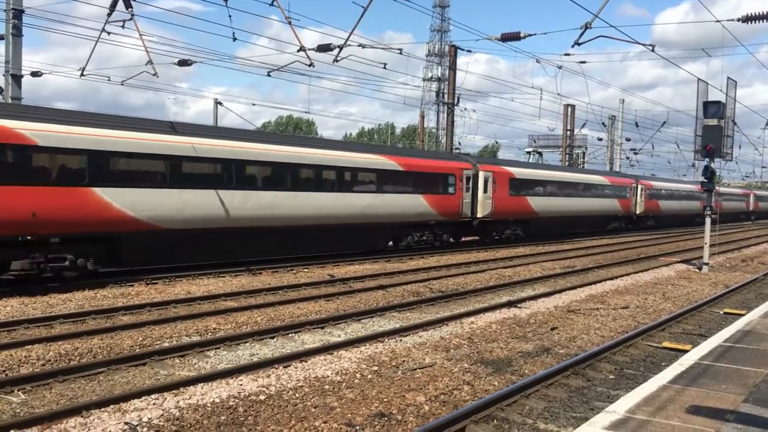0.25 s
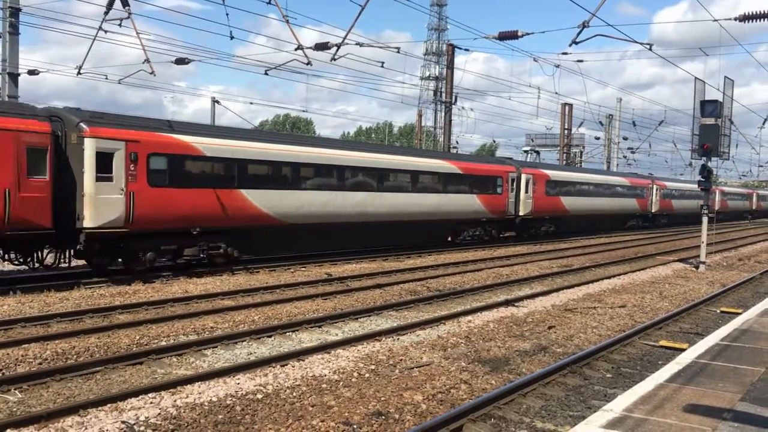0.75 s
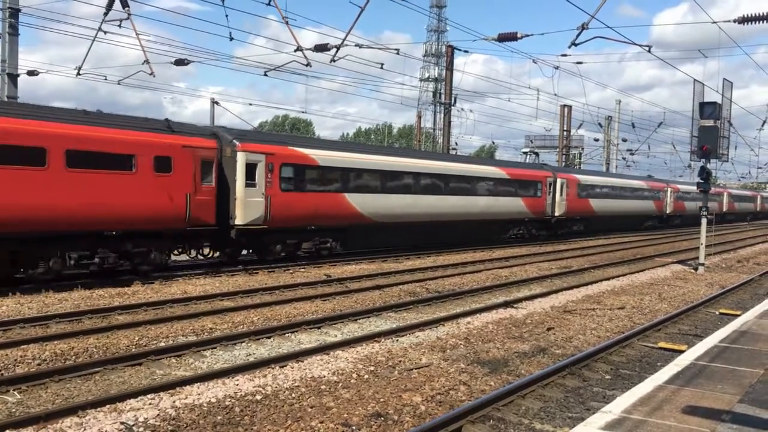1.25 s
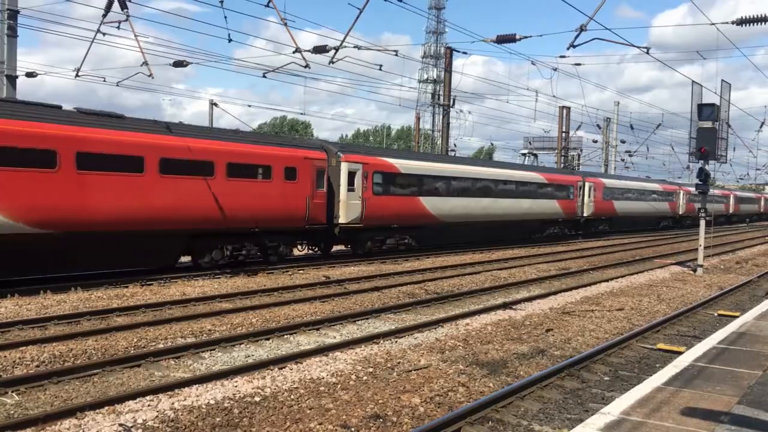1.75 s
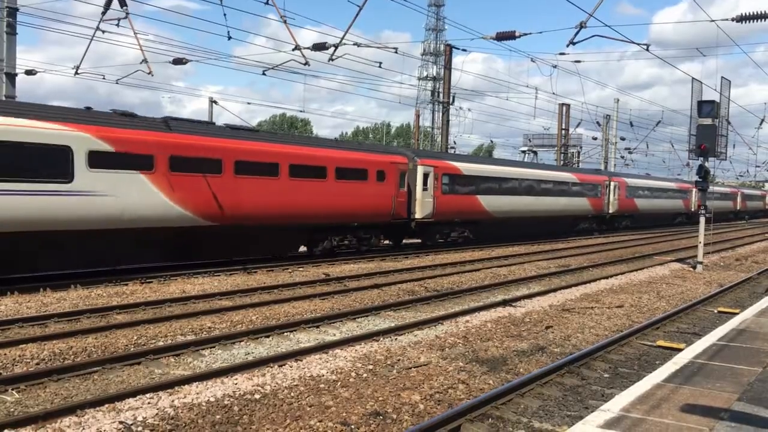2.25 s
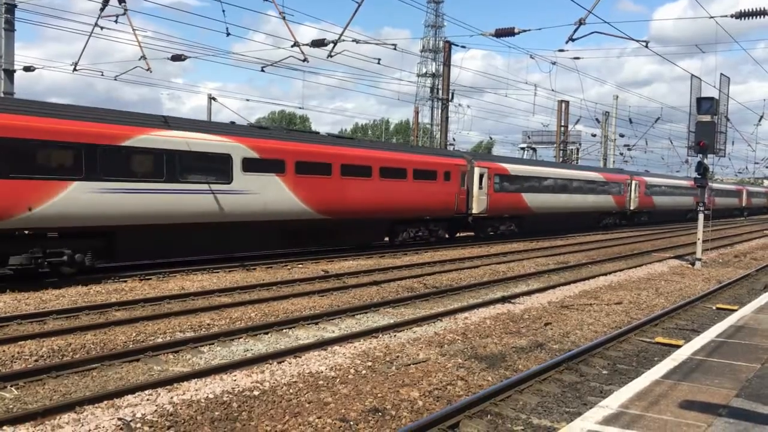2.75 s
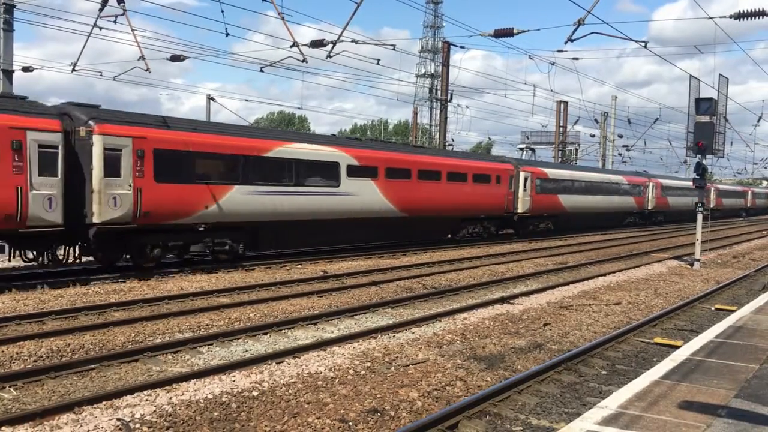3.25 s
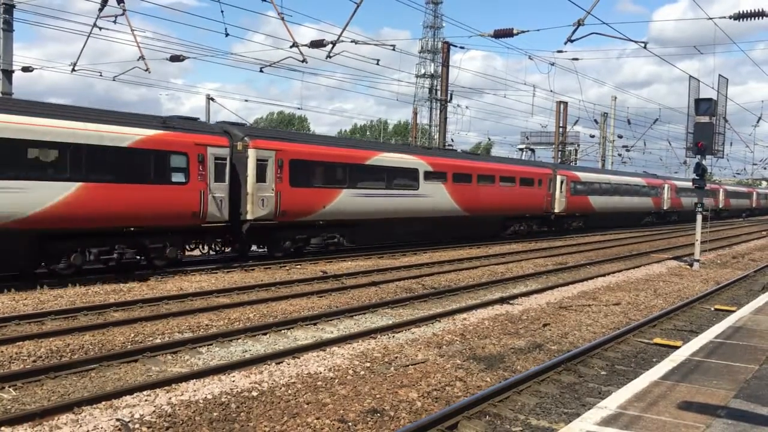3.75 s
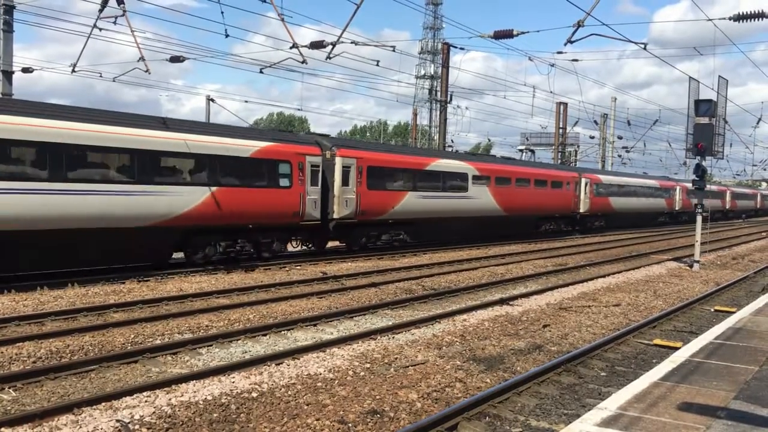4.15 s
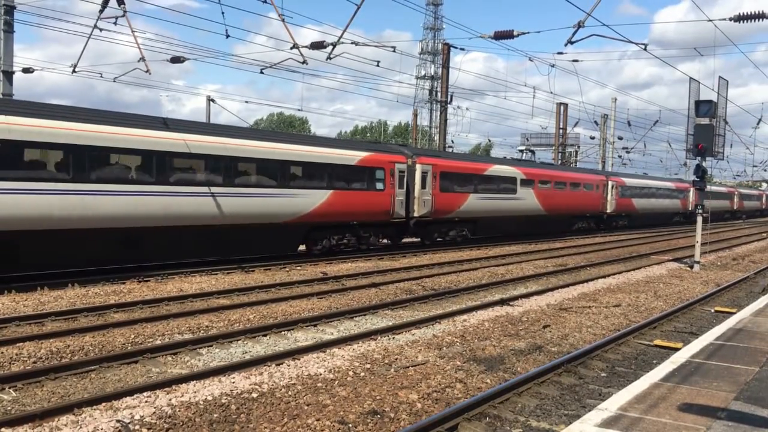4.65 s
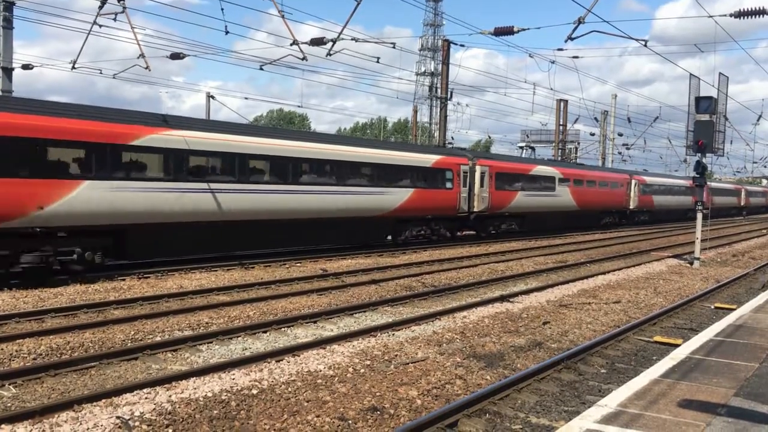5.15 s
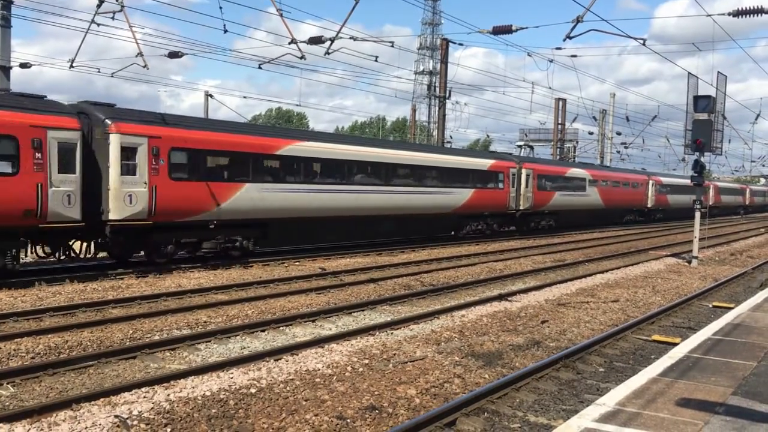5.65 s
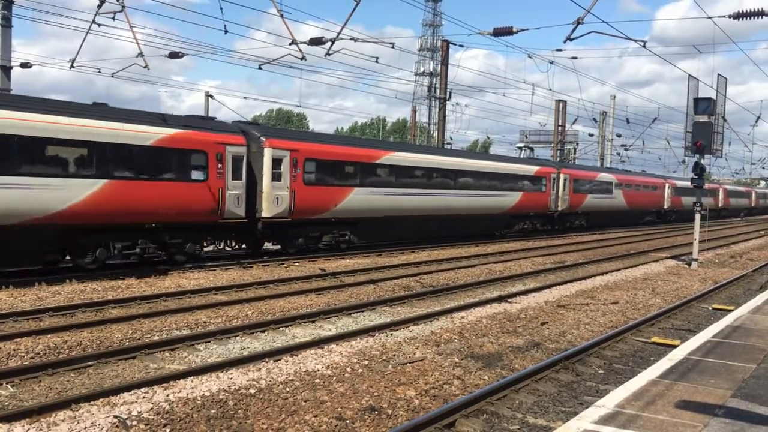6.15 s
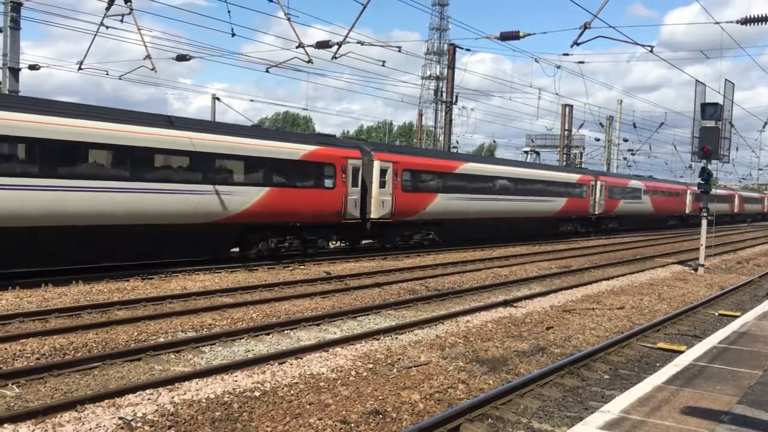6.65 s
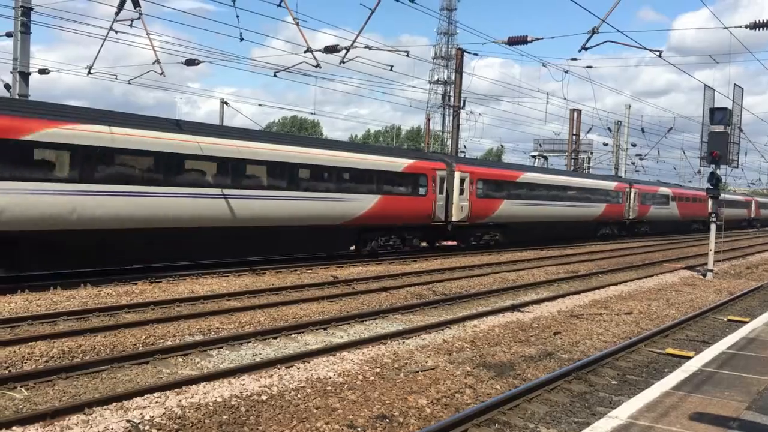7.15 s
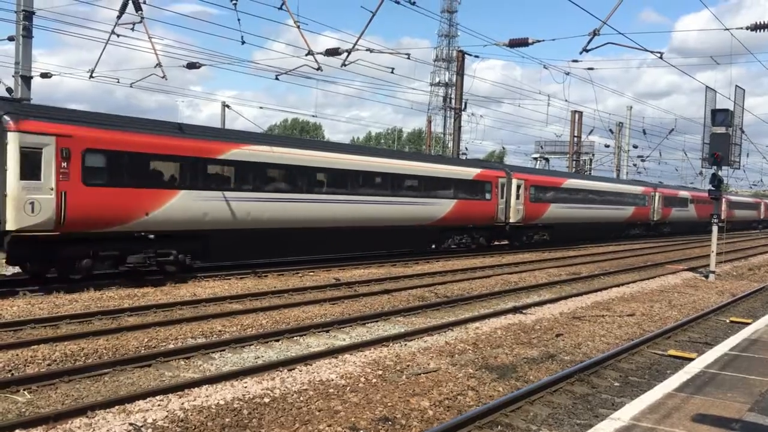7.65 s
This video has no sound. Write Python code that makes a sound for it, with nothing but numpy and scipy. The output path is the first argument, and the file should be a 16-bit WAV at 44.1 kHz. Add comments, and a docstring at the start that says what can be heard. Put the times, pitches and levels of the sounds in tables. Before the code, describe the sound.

Wind thumps and pops on the microphone as a passing train rumbles softly, its wheels clacking in pairs with a faint steel ring.

```python
"""From the start a breeze buffets the microphone in low lumps, over the hiss of its electronics,
while coaches roll slowly past a platform, wheels and rails rumbling and ringing faintly.
Soon the wind pops, and a faint hiss swells from the wheels, once a coach.
From 1.4 s the axles clack over one rail joint in groups of four: rail and wheel ring, the sleeper thuds.
Towards the end the rolling grows louder and the buffets crowd together."""
import sys
import numpy as np
from scipy import signal
from scipy.fft import rfft, irfft, next_fast_len
from scipy.io import wavfile
from scipy.ndimage import uniform_filter1d

SR = 44100
rng = np.random.default_rng(int(sys.argv[2]) if len(sys.argv) > 2 else 0)


def digitize_waveform(pressure):
    """Quantize a signal to 16-bit integers and store it at the path in sys.argv[1].

    Rows of a 2-D input are taken as channels; values are limited to [-1, 1].
    """
    field = np.atleast_2d(pressure).T
    bounded = np.clip(field, -1, 1)
    quanta = np.round(bounded * 32767).astype(np.int16)
    wavfile.write(sys.argv[1], SR, quanta)


N = 348779

# The wind's three colours: slow pressure swings, small eddies and the rush of the finest eddies.
# Each row: frequency in Hz, relative level in dB.
SWING_SPECTRUM = [(12, -44), (20, -4), (38, -1.5), (59, 5), (109, -6), (134, -22), (159, -17.5), (260, -30),
                  (340, -62), (570, -120)]
EDDY_SPECTRUM = [(80, -12), (130, 6), (200, -3.5), (320, -14.5), (500, -35.5), (900, -54.5), (1500, -58)]
RUSH_SPECTRUM = [(120, -24), (180, -2.5), (250, 3), (400, -7.5), (700, -22), (1200, -35), (2000, -52)]
# The breeze between buffets. Each row: time in seconds, then swing, eddy and rush levels in dB.
BREEZE_LEVELS = [(0.0, -37, -51.5, -76), (0.24, -40.5, -49.5, -67), (0.75, -40, -49.5, -67.5),
                 (1.17, -43.5, -52.5, -68), (1.58, -36, -50, -57), (1.96, -42, -50, -65.5),
                 (3.35, -37.5, -49, -60.5), (3.85, -39.5, -50.5, -62), (4.23, -41, -52, -65),
                 (4.67, -40.5, -48, -57.5), (5.15, -39, -45, -58), (5.93, -34, -49.5, -54.5),
                 (6.3, -39.5, -47.5, -57), (6.98, -35, -47, -51.5), (7.14, -39, -39.5, -52),
                 (7.42, -37, -45, -58.5), (7.73, -39.5, -43.5, -45), (7.91, -37, -34, -59)]
# Buffets on the microphone. Each row: peak time in seconds, swing, eddy and rush levels in dB,
# nominal length in seconds.
WIND_BUFFETS = [(0.082, -28.5, -44.5, -49, 0.016), (0.206, -30, -38, -57, 0.032),
                (0.444, -27, -46, -50.5, 0.055), (0.614, -30.5, -43.5, -55.5, 0.12),
                (0.809, -30, -31, -38, 0.012), (0.844, -33, -43, -64, 0.034), (0.886, -39, -36, -64, 0.026),
                (0.966, -31, -48, -58, 0.029), (1.037, -28, -42, -48, 0.019), (1.47, -33.5, -53, -66, 0.12),
                (1.626, -40, -46, -59, 0.2), (1.837, -30.5, -62, -64, 0.024),
                (2.073, -34.5, -52, -68, 0.042), (2.349, -26, -35, -56, 0.046),
                (2.569, -33, -60, -70, 0.11), (3.029, -26.5, -46, -59, 0.025),
                (3.175, -39, -38, -60, 0.034), (3.604, -39, -43, -70, 0.015), (3.827, -31, -51, -60, 0.13),
                (4.866, -31, -45, -58, .045), (4.979, -30.5, -48, -57, 0.037),
                (5.017, -20.5, -36, -51, 0.023), (5.101, -24.5, -33, -48.5, 0.07),
                (5.327, -22.5, -45, -56, 0.045), (5.454, -35, -42, -66, 0.069),
                (5.532, -31.5, -43, -49, 0.081), (5.708, -37, -43, -49, 0.032),
                (5.814, -34.5, -44, -59, 0.13), (5.946, -31, -42.5, -57, .06),
                (6.068, -31, -53, -62.5, 0.096), (6.342, -35, -44, -62, 0.046),
                (6.502, -34.5, -40, -59, 0.11), (6.603, -30.5, -47, -56, 0.063), (6.78, -33, -49, -70, .05),
                (6.925, -25.5, -34, -49, 0.019), (6.962, -28.5, -33, -43, 0.043),
                (7.055, -38, -33, -33, 0.13), (7.151, -31, -37, -44, 0.074), (7.378, -24, -31, -43.5, 0.05),
                (7.462, -27, -41, -50.5, 0.044), (7.519, -25, -34.5, -52.5, 0.062),
                (7.617, -38, -36, -33, 0.037), (7.702, -36.5, -38, -36, 0.21),
                (7.78, -29.5, -32, -53.5, 0.034), (7.878, -37.5, -30.5, -37, 0.075)]
# The train's swell. Each row: time in seconds, rumble level in dB, wheel ring level in dB.
ROLLING_LEVELS = [(0, -60.5, -91), (1.2, -59.5, -90.5), (2.3, -58.5, -85.5), (3.0, -59.5, -89),
                  (4.2, -57.5, -87.5), (5.4, -57.5, -86.5), (6.1, -55, -84.5), (7.0, -52, -89),
                  (7.5, -53.5, -81), (7.91, -55, -75)]
# The colour of steel rolling on steel. Each row: frequency in Hz, relative level in dB.
ROLLING_SPECTRUM = [(150, -23), (250, -2.5), (335, -4.5), (499, -14), (617, -11), (827, -19), (933, -18.5),
                    (1050, -21), (1550, -26.5), (1770, -29), (3720, -42.5), (4850, -53.5), (6000, -52.5),
                    (7800, -68.5), (13200, -120)]
# The colour of the electronics' hiss. Each row: frequency in Hz, relative level in dB.
HISS_SPECTRUM = [(1760, -18), (3000, -3.5), (4850, -9), (5380, -8), (7690, -11), (8940, -9.5), (10500, -14),
                 (12000, -12), (15500, -16.5)]
# Sudden pops of wind. Each row: peak time in seconds, peak level in dB, width in milliseconds.
WIND_POPS = [(0.442, -36, 0.76), (0.602, -35, 1.0), (0.805, -32, 0.93), (1.039, -37, 0.89), (3.176, -36, 1),
             (5.078, -18.5, 0.78), (5.093, -23.5, 1.0), (5.121, -32, 0.49), (5.698, -29, 0.94),
             (6.704, -25.5, 1), (6.919, -31, 0.84), (6.96, -14, 0.78), (7.005, -29.5, 0.97),
             (7.128, -37.5, .8), (7.368, -24, 0.92), (7.605, -27, 0.56), (7.714, -28, 0.98)]
# The wheel hiss, lower band then upper. Each row: centre in Hz, width in Hz.
WHEEL_BANDS = [(3100, 780), (6300, 1500)]
# One swell of wheel hiss a coach. Each row: start in seconds, lower and upper band levels in dB.
WHEEL_SWELLS = [(.57, -82.5, -92.5), (3.15, -87, -92.5), (5.45, -94, -94)]
# Axles over the joint, and one fainter knock between groups. Each row: start in seconds, rail, thud and
# edge levels in dB, contact time and thud delay in milliseconds, wheel ring level in dB.
AXLE_HITS = [(1.383, -50, -45.5, -64, 6.9, 17, -63), (1.664, -54, -43.5, -66.5, 18, 5, -66),
             (2.139, -54.5, -47.5, -69.5, 23, 5.5, -65), (2.417, -55.5, -46, -63, 15, 8.3, -68),
             (2.8, -63.5, -52, -83, 12, 6.1, -78), (3.823, -51, -38.5, -61.5, 7.8, 14, -67),
             (4.093, -55.5, -42, -67.5, 46, 11.4, -72), (4.547, -54.5, -43.5, -62.5, 15, 4, -63),
             (4.81, -53.5, -44.5, -62.5, 8.2, 7.17, -64), (6.163, -49.5, -42, -62, 19, 13.5, -67),
             (6.42, -52, -45, -65, 28, 8.4, -66), (6.88, -49, -47.5, -61.5, 14, 7, -65),
             (7.13, -50.5, -49, -71, 35, 3.7, -72), (7.891, -49.5, -50, -65.5, 14, 2.4, -68)]
# What a clack sets ringing: the bright rail edge, the rail, the dull sleeper and the wheel.
# Each row: frequency in Hz, width in Hz, relative level in dB.
EDGE_MODES = [(2480, 350, 0.5), (2900, 470, 4), (3470, 480, 2), (3930, 450, -2.5), (4480, 590, -11),
              (5500, 600, -13), (6770, 730, -16), (8200, 920, -26.5)]
RAIL_MODES = [(770, 160, -0.5), (960, 139, 4.5), (1150, 210, -0.5), (1334, 225, -4.5), (1460, 170, -5),
              (1656, 110, -7.5), (1740, 110, -12), (2125, 290, -10)]
SLEEPER_MODES = [(323, 34.6, -3.5), (570, 380, -17), (609, 60, -14)]
WHEEL_MODES = [(1052, 40, 3), (1600, 23, -5.5), (2160, 30, -2), (3020, 45, -7.5), (3440, 45, -11),
               (3690, 40, -10), (4500, 50, -14)]

LUMP_DB, LUMP_RATE_HZ = 2.5, 10.7   # unevenness of the breeze
SWING_SHARE, EDDY_SHARE = 0.73, 0.54   # half-power width of a buffet, as a share of its nominal length
DULL_FROM_DB, DULLING = -61.5, 1.1   # above this rolling level the treble lags: dB lost per dB gained
HISS_RISE_S, HISS_HOLD_S, HISS_FALL_S = 0.13, 0.37, 0.12   # shape of a wheel hiss swell
STEEL_DELAY_S = 0.0015   # from a clack's start to the sound of the steel
WHEEL_SPREAD_DB = 5   # each wheel rings its modes with strengths of its own
HISS_DB, LOW_CUT_HZ, HIGH_CUT_HZ, END_FADE_S = -81.5, 30.0, 15640, 0.003


def from_db(db):
    """Decibels to gain."""
    return 10 ** (np.asarray(db) / 20)


def rms_one(x):
    """Scale to rms 1."""
    return x / np.sqrt(np.mean(x ** 2) + 1e-20)


def fader_curves(rows):
    """Each level column of a timed table, drawn out to every sample."""
    times, *columns = np.transpose(rows)
    return [np.interp(np.arange(N) / SR, times, column) for column in columns]


def drift(rate_hz):
    """A slow random wobble: noise through a double one-pole low-pass, spread 1."""
    hop, settle = 40, 2000
    pole = np.exp(-2 * np.pi * rate_hz * hop / SR)
    noise = rng.standard_normal(N // hop + settle + 2)
    slow = signal.lfilter([1], [1, -2 * pole, pole * pole], noise)[settle:]
    return np.interp(np.arange(N) / hop, np.arange(len(slow)), rms_one(slow))


def coloured(spectrum):
    """Noise with the given spectrum, at rms 1."""
    size = next_fast_len(N)
    hz = np.fft.rfftfreq(size, 1 / SR)
    points_hz, db = np.transpose(spectrum)
    gain = from_db(np.interp(np.log(hz + 1), np.log(points_hz), db, left=-90, right=-90))
    return rms_one(irfft(gain * rfft(rng.standard_normal(size)), size)[:N])


def resonate(x, hz, width_hz):
    """One resonance, gain 1 at its peak."""
    r = np.exp(-np.pi * width_hz / SR)
    feedback = [1, -2 * r * np.cos(2 * np.pi * hz / SR), r * r]
    return signal.lfilter(np.array([1, 0, -1]) * (1 - r * r) / 2, feedback, x)


def evened(x, span_s):
    """Gentle compression that partly levels the chance swells of a noise."""
    power = uniform_filter1d(x ** 2, size=round(span_s * SR))
    return rms_one(x / (power + 0.11) ** 0.2)


def buffeted(breeze_db, column, share):
    """The wind's level in dB: each buffet adds a bell-shaped swell of power to the breeze."""
    power, t = from_db(2 * breeze_db), np.arange(N) / SR
    for row in WIND_BUFFETS:
        peak_s, width_s = row[0], share * row[4]
        near = slice(max(int((peak_s - 0.4) * SR), 0), int((peak_s + 0.4) * SR))
        bell = np.exp(-4 * np.log(2) * ((t[near] - peak_s) / width_s) ** 2)
        power[near] += from_db(2 * row[column]) * bell
    return 10 * np.log10(power)


def wind():
    """Turbulence comes in lumps: pressure swings, small eddies flutter, hard gusts add a finer rush."""
    swing_db, eddy_db, rush_db = fader_curves(BREEZE_LEVELS)
    lumps = drift(LUMP_RATE_HZ)
    eddy_lumps_db = LUMP_DB * (0.32 * lumps + 0.57 * drift(LUMP_RATE_HZ))
    swing_db = buffeted(swing_db + LUMP_DB * lumps, column=1, share=SWING_SHARE)
    eddy_db = buffeted(eddy_db + eddy_lumps_db, column=2, share=EDDY_SHARE)
    rush_db = buffeted(rush_db + eddy_lumps_db, column=3, share=EDDY_SHARE)
    flutter_db = 3.0 * drift(rate_hz=30)
    swings = evened(coloured(SWING_SPECTRUM), span_s=0.035) * from_db(swing_db + 2.9 * drift(rate_hz=21))
    eddies = evened(coloured(EDDY_SPECTRUM), span_s=0.029) * from_db(eddy_db + flutter_db)
    rush = evened(coloured(RUSH_SPECTRUM), span_s=0.014) * from_db(rush_db + 0.68 * flutter_db)
    return swings + eddies + rush


def rolling():
    """Rough steel on steel: the rumble outgrows the treble as it swells, and one wheel mode sings."""
    level_db, ring_db = fader_curves(ROLLING_LEVELS)
    treble_db = -DULLING * np.maximum(level_db - DULL_FROM_DB, 0)
    rumble = coloured(ROLLING_SPECTRUM)
    treble = signal.sosfilt(signal.butter(2, 2000, "high", fs=SR, output="sos"), rumble)
    rumble = rumble + (from_db(treble_db) - 1) * treble
    ring = rms_one(resonate(rng.standard_normal(N), hz=2154, width_hz=110))
    return from_db(level_db + 0.93 * drift(rate_hz=22)) * rumble + from_db(ring_db) * ring


def wind_pops():
    """Each pop is a lone smooth pressure bump; the narrower, the brighter."""
    out, offsets = np.zeros(N), np.arange(-300, 300)
    for peak_s, db, width_ms in WIND_POPS:
        squared = (offsets / SR / (width_ms / 1000)) ** 2
        bump = (1 - 0.16 * squared / (1 + squared)) / (1 + squared) ** 0.95
        out[round(peak_s * SR) + offsets] += from_db(db) * bump * np.hanning(len(offsets))
    return out


def wheel_hiss():
    """The wheels hiss in two broad bands of noise that rise, hold and fall once a coach."""
    out, t = np.zeros(N), np.arange(N) / SR
    for band, (hz, width_hz) in enumerate(WHEEL_BANDS):
        swell = np.zeros(N)
        for start_s, *band_db in WHEEL_SWELLS:
            corners_s = np.cumsum([start_s, HISS_RISE_S, HISS_HOLD_S, HISS_FALL_S])
            swell += from_db(band_db[band]) * np.interp(t, corners_s, [0, 1, 1, 0])
        out += swell * rms_one(resonate(rng.standard_normal(N), hz, width_hz))
    return out


def body(force, modes):
    """A force rings parallel modes of alternating polarity; white noise keeps about its level."""
    power = sum(from_db(2 * db) * np.pi * width_hz / SR for _, width_hz, db in modes)
    ringing = sum((-1) ** k * from_db(db) * resonate(force, hz, width_hz)
                  for k, (hz, width_hz, db) in enumerate(modes))
    return ringing / np.sqrt(power)


def struck(modes, column, delays_s, knock, grind_fall_s, rattle_db, rattle_t60_s):
    """Each axle knocks once, grinds across the gap for the contact time, and leaves a weaker rattle."""
    force, t = np.full(N + SR, 1e-18), np.arange(SR // 2) / SR
    roughness = rng.standard_normal(N + SR)
    for row, delay_s in zip(AXLE_HITS, delays_s):
        start, gain, contact_s = round((row[0] + delay_s) * SR), from_db(row[column]), row[4] / 1000
        released_s = np.maximum(t - contact_s, 0)
        grind = from_db(-400 * t - 60 * released_s / grind_fall_s)   # dies faster once contact ends
        rattle = from_db(rattle_db - 60 * released_s / rattle_t60_s)
        span = slice(start, start + len(t))
        force[span] += gain * (grind + rattle) * roughness[span]
        force[start] += gain * knock
    return body(force[:N], modes)


def clacks():
    """An axle hits the joint: edge and rail speak first, then the thud of the sleeper."""
    steel_delays_s = np.full(len(AXLE_HITS), STEEL_DELAY_S)
    thud_delays_s = np.array(AXLE_HITS)[:, 5] / 1000
    edge = struck(EDGE_MODES, column=3, delays_s=steel_delays_s, knock=10.0,
                  grind_fall_s=0.15, rattle_db=-15, rattle_t60_s=0.58)
    rail = struck(RAIL_MODES, column=1, delays_s=steel_delays_s, knock=15.5,
                  grind_fall_s=0.32, rattle_db=-8.0, rattle_t60_s=0.44)
    thud = struck(SLEEPER_MODES, column=2, delays_s=thud_delays_s, knock=19.4,
                  grind_fall_s=0.65, rattle_db=-10.5, rattle_t60_s=0.13)
    soften = signal.butter(2, 1100.0, fs=SR, output="sos")   # timber and ballast give a soft contact
    return edge + rail + signal.sosfilt(soften, thud)


def wheel_rings():
    """The blow at the joint sets the wheel ringing briefly."""
    out, hits = np.zeros(N), np.array(AXLE_HITS)
    starts, ring_db = ((hits[:, 0] + STEEL_DELAY_S) * SR).astype(int), hits[:, 6]
    spread_db = WHEEL_SPREAD_DB * rng.standard_normal((len(hits), len(WHEEL_MODES)))
    for k, (hz, width_hz, db) in enumerate(WHEEL_MODES):
        blows = np.full(N, 1e-18)
        blows[starts] = from_db(ring_db + db + spread_db[:, k])
        out += resonate(blows, hz, width_hz) * SR / (2 * np.pi * width_hz)
    return out


def scene():
    """Wind and train, mixed in mono at one microphone."""
    return (wind() + rolling() + wind_pops() + wheel_hiss() + clacks() + wheel_rings())[None]


def record(dry):
    """The electronics add hiss, the deepest bass and the top are cut, and a short fade closes the end."""
    x = dry + from_db(HISS_DB) * coloured(HISS_SPECTRUM)
    x = signal.sosfilt(signal.butter(4, LOW_CUT_HZ, "high", fs=SR, output="sos"), x)
    fade = np.minimum(np.arange(N)[::-1] / (END_FADE_S * SR), 1)
    return signal.sosfilt(signal.ellip(14, 0.5, 80, HIGH_CUT_HZ, fs=SR, output="sos"), x * fade)


dry = scene()
out = record(dry)
digitize_waveform(out)
```